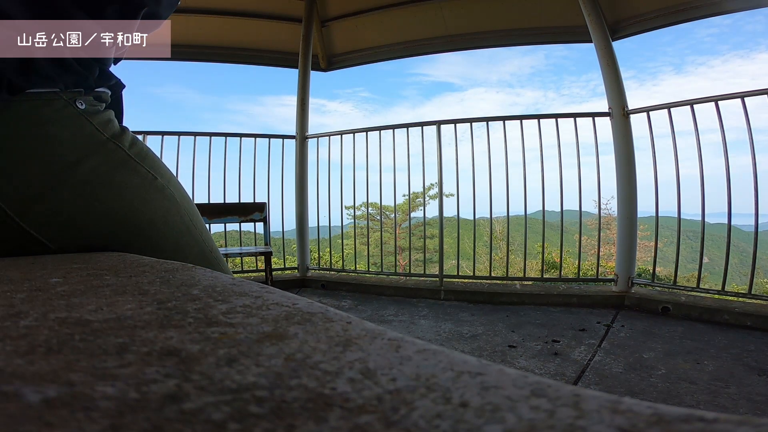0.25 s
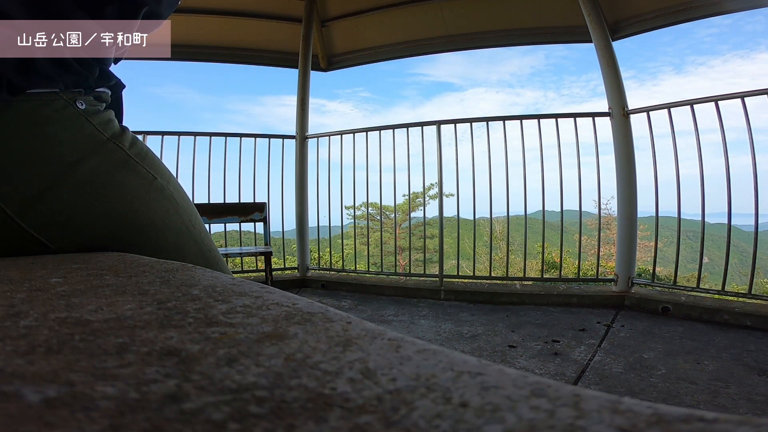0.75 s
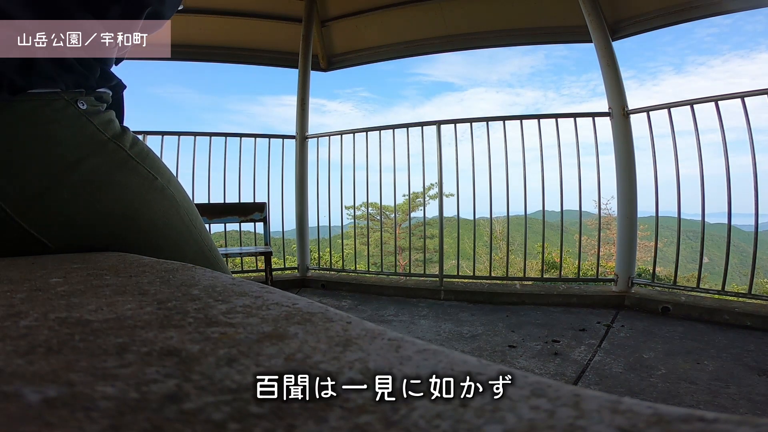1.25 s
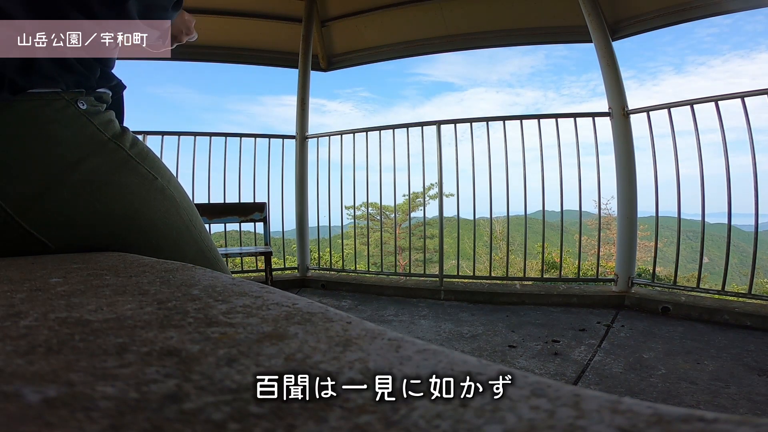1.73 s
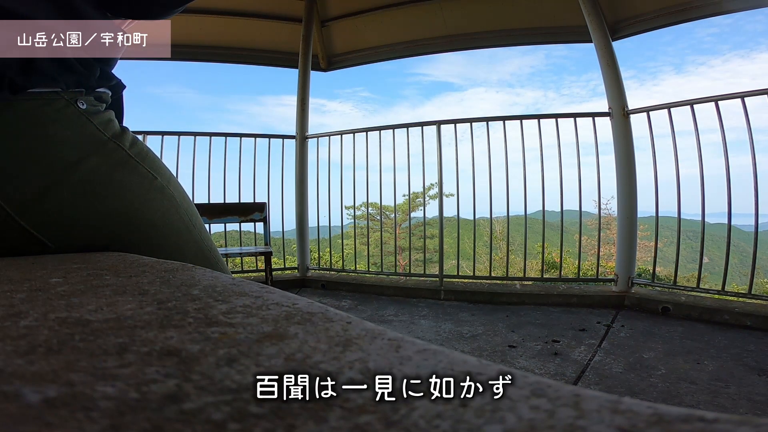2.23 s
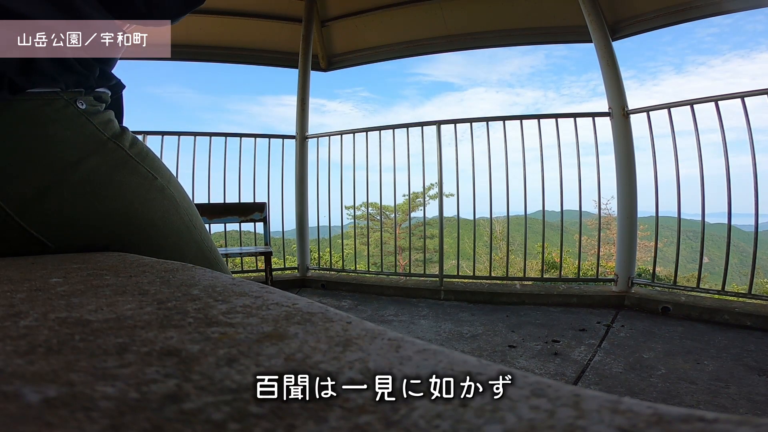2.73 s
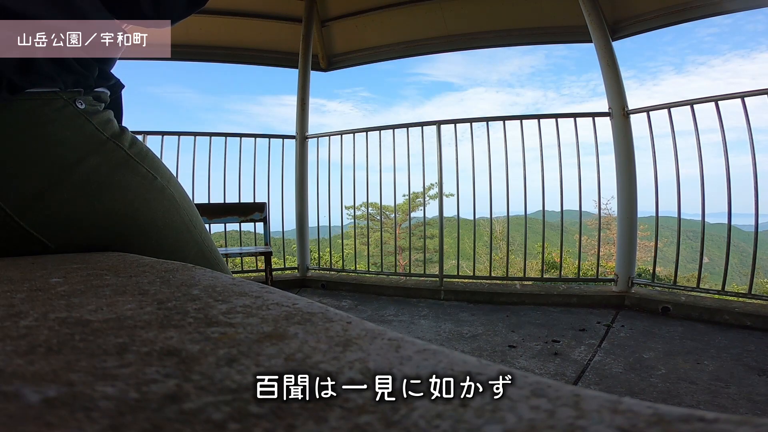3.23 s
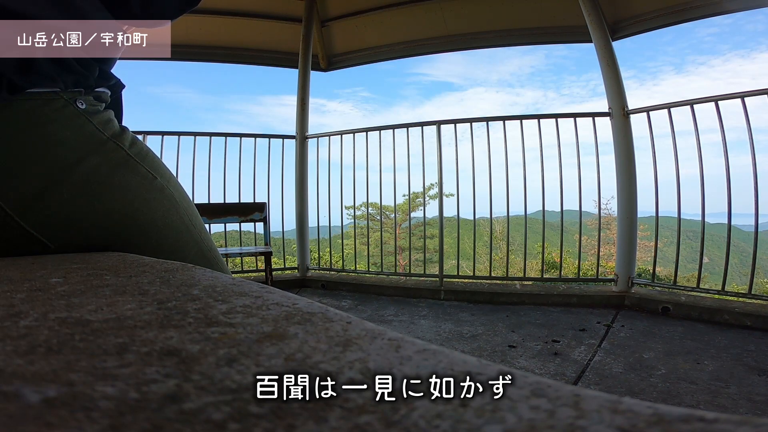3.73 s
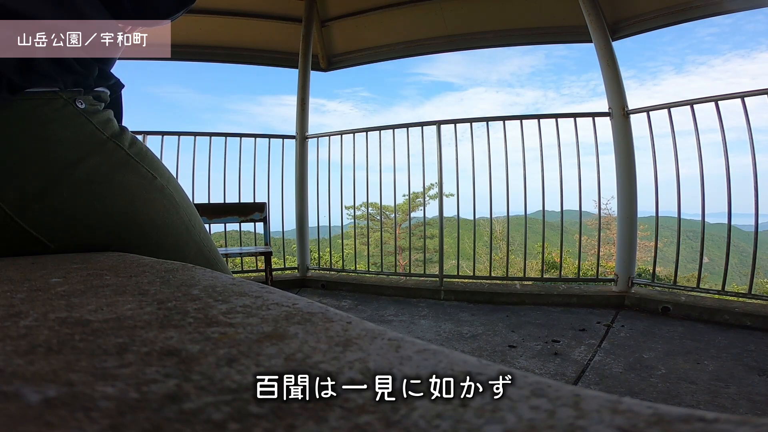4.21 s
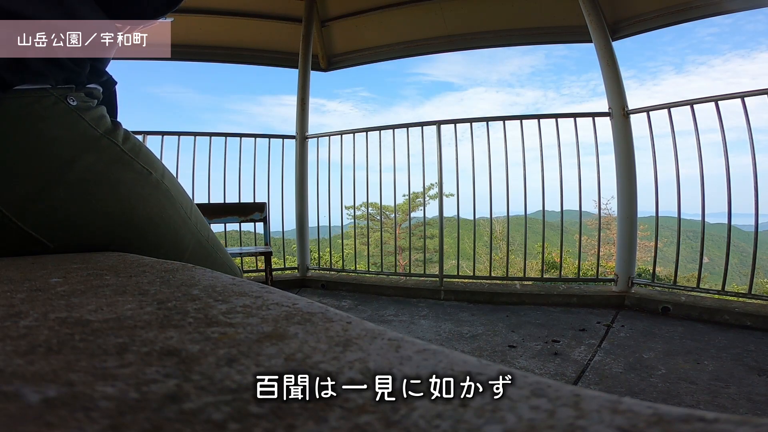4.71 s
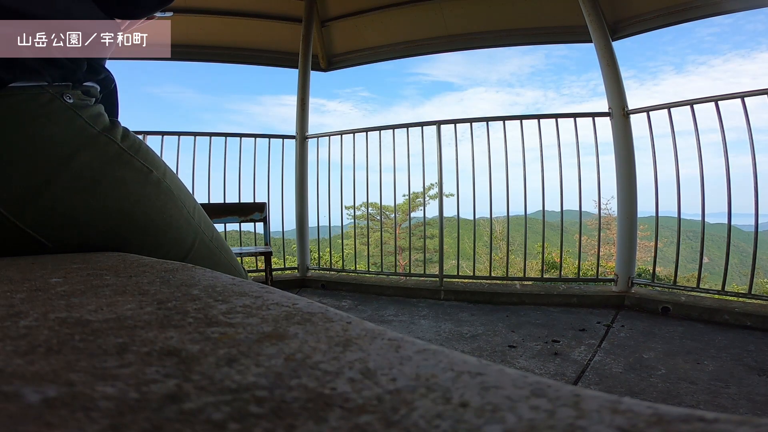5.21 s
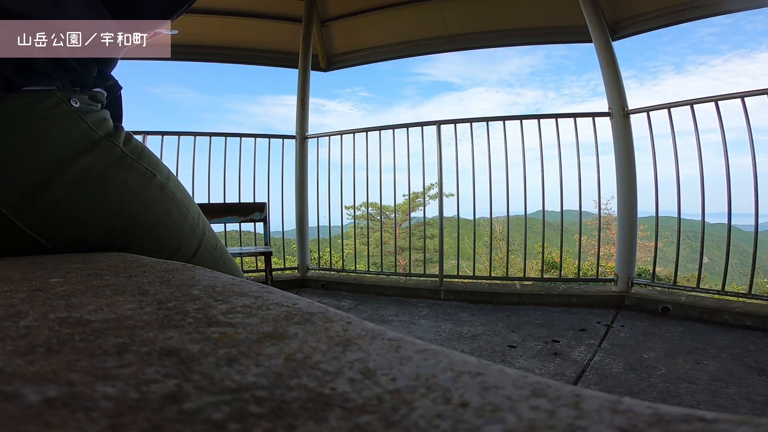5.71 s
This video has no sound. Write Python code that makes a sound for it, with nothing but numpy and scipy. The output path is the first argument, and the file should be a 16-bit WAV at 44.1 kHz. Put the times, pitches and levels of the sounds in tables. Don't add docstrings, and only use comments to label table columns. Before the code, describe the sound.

Dense summer cicadas shimmer over a hilltop shelter while a slow single-cylinder engine thumps far below and a songbird whistles two quick phrases.

```python
import sys
import numpy as np
from scipy import signal
from scipy.fft import rfft, irfft
from scipy.io import wavfile
from scipy.ndimage import uniform_filter1d

SR = 44100
rng = np.random.default_rng(int(sys.argv[2]) if len(sys.argv) > 2 else 0)


def master(y):
    cut = np.clip(np.atleast_2d(y).T, -1, 1)
    pcm = np.round(cut * 32767)
    wavfile.write(sys.argv[1], SR, pcm.astype(np.int16))


def rack_gain(trim_db):
    fader = np.asarray(trim_db, float)
    return 10 ** (fader / 20)


N = 262822
T = np.arange(N) / SR


def level(x, db):
    return x * rack_gain(db) / np.sqrt(np.mean(x ** 2))


def curves(table):
    s, *columns = np.transpose(table)
    return [np.interp(T, s, c) for c in columns]


def gate(start, length, edge):
    return np.clip(np.minimum(T - start, start + length - T) / edge + .5, 0, 1)


def colour(x, points):
    hz, db = np.transpose(points)
    f = np.fft.rfftfreq(N, 1 / SR) + 1
    gain = rack_gain(np.interp(np.log(f), np.log(hz), db, -120, -120))
    return irfft(rfft(x) * gain, N)


def walk(rate):
    k = int(SR / rate)
    held = np.repeat(rng.standard_normal(N // k + 1), k)
    return 1.3 * uniform_filter1d(uniform_filter1d(held, k), k)[:N]


def pair(alike):
    share = np.sqrt(np.clip([[1 + alike], [1 - alike]], 0, 2))
    mid, side = rng.standard_normal((2, N)) * share
    return np.array([mid + side, mid - side])


def clicks(at, size):
    keep = (at >= 0) & (at < N - 1)
    at, size = at[keep], size[keep]
    i = at.astype(int)
    return np.bincount(i, size * (1 + i - at), N) + np.bincount(i + 1, size * (at - i), N)


def echoes(x, t60, wet_db, gap=0.01203):
    t = np.arange(int(.6 * SR)) / SR
    tail = rng.standard_normal((2, len(t))) * 1000. ** (-t / t60) * (t > gap)
    tail = tail / np.sqrt(np.sum(tail ** 2, axis=1, keepdims=True))
    return rack_gain(wet_db) * signal.fftconvolve(x[None], tail, axes=1)[:, :N]


def place(x, pan_db, lag):
    late = np.interp(np.arange(N) - lag, np.arange(N), x)
    return np.array([x * rack_gain(pan_db / 2), late * rack_gain(-pan_db / 2)])


def ring(x, modes, swell):
    t = np.arange(int(.3 * SR)) / SR
    shape = sum(rack_gain(db) * np.sin(2 * np.pi * hz * t) * 1000. ** (-t / t60) for hz, db, t60 in modes)
    return signal.fftconvolve(x, shape * (1 - np.exp(-t / swell)) ** 2)[:N]


# pitch in Hz, level in dB, time to fade by 60 dB in seconds.
BARK = [(106, 0, .075), (198, -7, .045), (150, -12, .05)]
# pitch in Hz, level in dB, fade time in seconds.
SNARL = [(126, 0, .068), (212, -7, .045), (320, -24, .03)]
# pitch in Hz, level in dB, fade time in seconds.
BOOM = [(40, 0, .065), (60, -2.5, .065)]
# pitch in Hz, level in dB per Hz.
RUMBLE = [(12, -48), (20, -33), (43, 2.5), (113, -8.5), (131, -7), (173, 2.5), (214, 2), (271, -25),
          (400, -23), (520, -65), (880, -120)]
# time in seconds, firings per second.
ENGINE_SPEED = [(0, 11.34), (.62, 12.39), (1.33, 9.87), (1.67, 12.86), (2.41, 13.83), (2.91, 15.92),
                (3.07, 13.99), (4, 11.05), (4.25, 12.13), (5.24, 11.46), (5.39, 12.03), (5.96, 12.01)]
# time in seconds, bark level in dB, boom compared with bark in dB.
ENGINE_LOAD = [
    (0, -47.5, -6.5),
    (1.4, -51.5, -5),
    (1.8, -43.5, -5.5),
    (2.9, -45.5, -6),
    (3.1, -46, -2.5),
    (4.5, -45, -2.5),
    (5.96, -48.5, -1),
]


def engine():
    rate = curves(ENGINE_SPEED)[0]
    turns = np.cumsum(rate) / SR + .04
    chance = rng.standard_normal((80, 3)).T[:, :int(turns[-1]) + 1]
    at = np.interp(np.arange(chance.shape[1]), turns, T, .009) + .002 * chance[0]
    throttle = np.clip((np.interp(at, T, rate) - 11.5) / 4, 0, 1)
    size = rack_gain(2.5 * (1 - .6 * throttle) * chance[1])
    bark_db, boom_db = curves(ENGINE_LOAD)

    firing = (at - .008) * SR
    bark = ring(clicks(firing, size * (1 - .85 * throttle)), BARK, .012)
    snarl = ring(clicks(firing, size * (.12 + 1.1 * throttle)), SNARL, .011)
    boom_at = (at + 0.01396 + 0.0051 * chance[0]) * SR
    boom = ring(clicks(boom_at, rack_gain(2.7 * chance[2])), BOOM, 0.025)
    near = level(bark + snarl, -0.28) + rack_gain(boom_db) * level(boom, 1.0)

    back = echoes(near, .2, -13, gap=.02)
    late_boom = rack_gain(boom_db) * level(np.roll(boom, 900), 0)
    spread = (0.084 * back[1] + 0.081 * late_boom) * np.array([[1], [-1]])
    rumble = level(colour(pair(.95), RUMBLE), -16) * rack_gain(3.5 * walk(9))
    roar = colour(pair(.5), [(250, -12), (400, -4), (900, -13), (2000, -2), (3000, -25)])
    roar = level(roar, -19.5) * np.interp(T, at, throttle)
    return rack_gain(bark_db) * (near + back[0] + spread + rumble + roar)


# time in seconds, level in dB, left minus right in dB.
CHORUS = [
    (0.0, -34.5, -1),
    (4.48, -35.5, -1.5),
    (5.96, -35, -1),
]
# pitch in Hz, level in dB per Hz.
CHORUS_COLOUR = [(3000, -48), (4000, -28), (5030, -21.5), (5950, -11), (6500, -5.5), (7400, -3), (8000, 0),
                 (8350, 0.2), (8750, 0.6), (9150, -4.5), (9980, -12), (10800, -26), (11500, -40),
                 (15000, -60)]


def chorus(count=14):
    db, pan_db = curves(CHORUS)
    out = 0
    for rate in rng.random(count):
        drift = 1 + .012 * walk(.7) + .0015 * walk(25)
        turns = np.cumsum((430 + 120 * rate) * drift) / SR
        at = np.interp(np.arange(int(turns[-1])), turns, np.arange(N))
        at = at + 0.65 * rng.standard_normal(len(at))
        out = out + clicks(at, np.ones(len(at))) * rack_gain(3.6 * walk(2.52))
    blur = level(colour(pair(-0.15), CHORUS_COLOUR), -0.91)
    blur = blur * rack_gain(0.23 * np.array([walk(7.4), walk(8)]))
    voices = level(colour(echoes(out, 0.093, 0, gap=0), CHORUS_COLOUR), -3.5)
    return (blur + voices) * rack_gain(db + np.array([pan_db, -pan_db]) / 2)


# time in seconds, clicks per second, pitch the hollow belly
# favours in Hz, width of that favoured band in Hz, level in dB.
NEAR_LEFT = [
    (0, 469, 6750, 398, -55.5),
    (1.2, 479.3, 6390, 453, -46),
    (2, 488.3, 6196, 522, -46),
    (2.6, 497, 5880, 601, -46),
    (4, 510.5, 5820, 560, -45.5),
    (4.5, 514.4, 5740, 447, -42),
    (4.58, 490, 6900, 596, -54.5),
    (4.68, 485, 7850, 900, -45),
    (5.96, 486.5, 8000, 900, -47),
]
NEAR_RIGHT = [
    (0, 496, 6600, 400, -84),
    (3.4, 510, 6750, 400, -51),
    (4.1, 500, 7050, 400, -57),
    (4.8, 528, 6340, 500, -46.5),
    (5.96, 523, 6220, 499.7, -63),
]


def cicada(table, pan_db, lag, wobble, rasp):
    hz, belly_hz, width_hz, db = curves(table)
    phase = 2 * np.pi * np.cumsum(hz * (1 + wobble * walk(60) + .002 * walk(3))) / SR
    x = 0
    for k in range(9, 21):
        belly = np.exp(-.5 * ((k * hz - belly_hz) / width_hz) ** 4)
        x = x + belly * rack_gain(0.49 * walk(24.86)) * np.sin(k * phase)
    x = x * rack_gain(db) * (1 + rasp * walk(550))
    return place(x, pan_db, lag) + echoes(x, .25, -4)


def near_cicadas():
    left = cicada(NEAR_LEFT, pan_db=-.3, lag=3, wobble=.003, rasp=1.6)
    right = cicada(NEAR_RIGHT, pan_db=-6, lag=-4, wobble=.0025, rasp=.9)
    return left + right


# pitch in Hz, level in dB per Hz.
HIGH_COLOUR = [(6180, -40), (10500, -4), (11000, -2.5), (13100, -3.5), (15500, -11.5)]
# start in seconds, length in seconds, level in dB.
HIGH_BURSTS = [
    (-.05, 0.24, -55),
    (0.601, .2, -54.5),
    (1.147, .3, -55.5),
    (1.81, .23, -54.5),
    (2.095, 0.297, -55),
    (2.353, 4, -56.5),
]


def high_cicada():
    rest_db, edge_s = -60, 0.024
    bursts = [(top_db - rest_db) * gate(s, length, edge_s) for s, length, top_db in HIGH_BURSTS]
    db = rest_db + np.max(bursts, axis=0)
    grain = rng.standard_normal((2, N)) * rack_gain(2.5 * rng.standard_normal(N))
    x = level(colour(grain + pair(-0.33), HIGH_COLOUR), 0.34) * rack_gain(db + 0.49 * walk(13.0))
    return x * rack_gain(np.array([[-1.3], [1.3]]))


# pitch in Hz, level in dB per Hz.
AIR = [(150, 4), (250, -3), (434, -14.5), (708, -13), (1020, -14.5), (1700, -8.5), (1900, -10),
       (2710, -8.5), (3560, -13), (4640, -18), (5000, -2), (6500, -39), (11000, -120)]


def air():
    hiss = level(colour(pair(0.19), AIR), -57) * rack_gain(0.19 * walk(2.75))
    hum = colour(pair(0.038), [(450, -27), (600, -4.0), (700, 1.5), (850, -6.0), (1300, -7.0), (1500, -6.5)])
    hum = level(hum, 1)
    start_db, last_db, swell_s = -66.5, -71, 1.8
    leaving_db = np.maximum(start_db + 4 - 4.5 * (T - swell_s), last_db)
    hum_db = start_db + (leaving_db - start_db) * gate(swell_s, 9, 0.18)
    return hiss + hum * rack_gain(hum_db + 2 * walk(10))


# time in seconds, peak level in dB, pitch in Hz.
KNOCKS = [
    (.134, -42, 490),
    (5.357, -38, 750),
    (5.359, -39, 1500),
    (5.36, -46, 2400),
    (5.352, -45, 453.6),
]


def knocks():
    out = np.zeros(N)
    for s, db, hz in KNOCKS:
        tap = clicks(np.array([s * SR]), np.ones(1))
        out += rack_gain(db) * ring(tap, [(hz, 0, .009)], .0004)
    return out + echoes(out, 0.057, 0, gap=0.0017)


# start in seconds, length in seconds, first pitch in Hz,
# last pitch in Hz, level in dB.
FLICKS = [(.241, 0.016, 1720, 2385, -51), (.331, 0.028, 1555, 2540, -51.5),
          (.466, 0.034, 1930, 2855, -48.5), (1.099, 0.016, 1900, 2880, -46),
          (1.467, 0.0198, 1740, 2590, -50), (1.67, 0.036, 1930, 2980, -46.5),
          (2.062, 0.017, 1830, 2604, -46.5)]
LEAD_INS = [(.424, 0.02, 1500, 1855, -51.5), (.446, 0.021, 1851, 1922, -49.5),
            (1.066, 0.032, 1660, 1900, -48.5), (1.563, .03, 1680, 2148, -52),
            (1.628, 0.045, 1459, 1940, -50), (2.08, .024, 2600, 2840, -51)]
DIVES = [
    (0.749, 0.051, 3350, 1796, -50.5),
    (.79, .03, 1855, 1460, -50.5),
    (1.593, .026, 2135, 1740, -52),
    (2.012, 0.042, 3330, 1800, -50.5),
]
HOLDS = [
    (.82, .109, 1488, 1489, -54.5),
    (.931, 0.14, 1627, 1642, -51),
    (2.055, 0.0054, 1823, 1870, -47),
]
TRILLS = [
    (.575, .167, 3560, 3740, -55.5),
    (1.768, .234, 3700, 3700, -57),
]
# start in seconds, length in seconds, level against the note in dB.
SECOND_VOICE = [
    (.825, .03, -10),
    (.94, .12, -11),
]
# pitch in Hz, level in dB.
BIRD_LEFT = [(1000, -4), (1500, -3), (1900, 0), (2300, -6), (2650, 2), (3000, -1), (3300, -3), (3750, -5),
             (4300, -9), (8000, -30)]
# pitch in Hz, level in dB.
BIRD_RIGHT = [(1000, 1), (1500, 2), (1900, 4), (2350, 3), (2650, 0), (3000, 1), (3300, 3), (3750, -1),
              (4300, -6), (8000, -30)]


def bird():
    gestures = sorted(FLICKS + LEAD_INS + DIVES + HOLDS + TRILLS)
    s, length, from_hz, to_hz, db = np.transpose(gestures)
    slur = int(0.0054 * SR)
    ends = np.sort(np.ravel([s + 1e-5, s + length], order="F"))
    hz = uniform_filter1d(np.interp(T, ends, np.ravel([from_hz, to_hz], order="F")), slur)
    puffs = [rack_gain(d) * gate(a, b, .0019) for a, b, d in zip(s, length + .001, db)]
    breath = uniform_filter1d(np.max(puffs, axis=0), slur)

    trill = np.clip((hz - 3300) / 250, 0, 1) * (70 * np.sin(2 * np.pi * 42 * T) + 40 * walk(120))
    phase = 2 * np.pi * np.cumsum(hz * (1 + .002 * walk(90)) + trill) / SR
    second = sum(rack_gain(d) * gate(a, b, .015) for a, b, d in SECOND_VOICE)
    second = second * np.sin(phase + 2 * np.pi * 270 * T)
    glide = np.minimum(np.abs(np.gradient(hz)) * SR / 1000, 25)
    octave_db = -5 - 6 * np.abs(hz - 1600) / 1000 - .42 * glide + 2 * walk(110)
    octave = rack_gain(octave_db) * np.sin(2 * phase)
    beak = rack_gain(4 * np.exp(-((hz - 1900) / 110) ** 2))
    out = breath * (beak * np.sin(phase) + octave + second)
    out = out * rack_gain(2.1 * walk(130) + 2.5)

    haze = out * rack_gain(-6) * (walk(2200) + walk(500))
    haze = colour(haze, [(1100, -25), (1500, -1), (2800, 0), (4500, 3), (6000, -15)])
    haze = echoes(haze, 0.42, 3.6, gap=.004) * rack_gain([[-1.5], [1.5]])
    left, right = place(out, 0, -1) + echoes(out, .3, -7.5, gap=.012)
    return np.array([colour(left, BIRD_LEFT), colour(right, BIRD_RIGHT)]) + haze


def scene():
    return engine() + chorus() + near_cicadas() + high_cicada() + air() + knocks() + bird()


def low_pass(x):
    return signal.sosfilt(signal.butter(12, 15660, fs=SR, output="sos"), x)


def record(dry):
    return low_pass(dry)


dry = scene()
out = record(dry)
master(out)
```